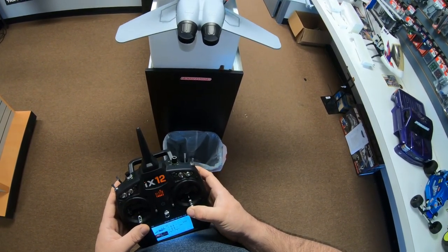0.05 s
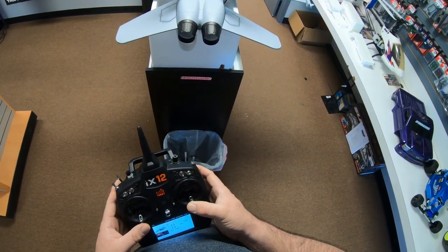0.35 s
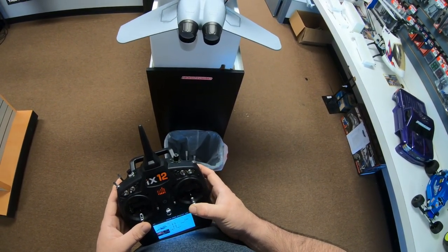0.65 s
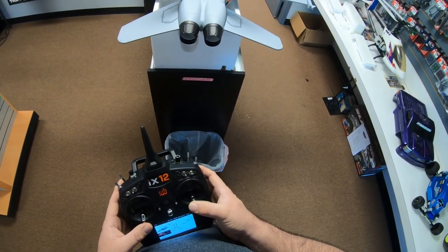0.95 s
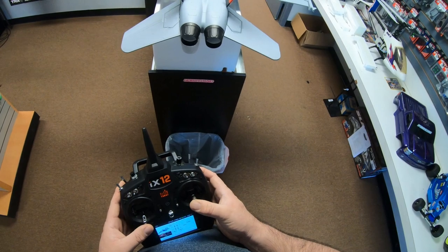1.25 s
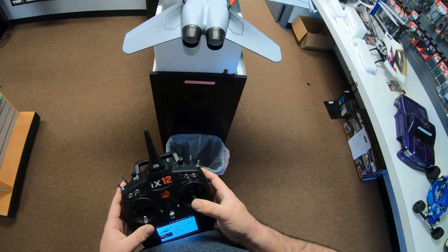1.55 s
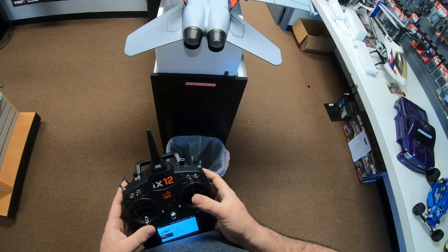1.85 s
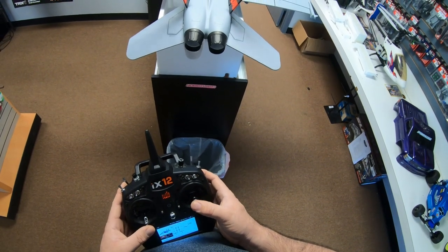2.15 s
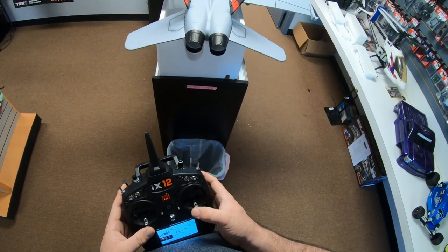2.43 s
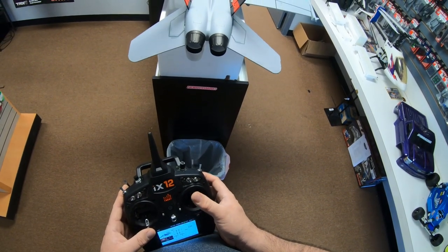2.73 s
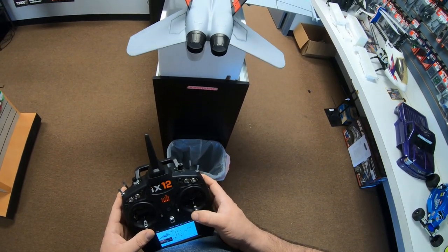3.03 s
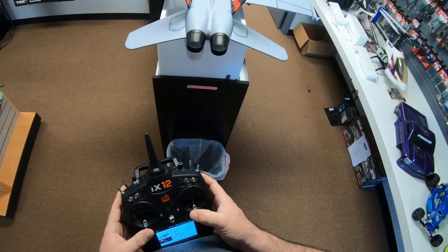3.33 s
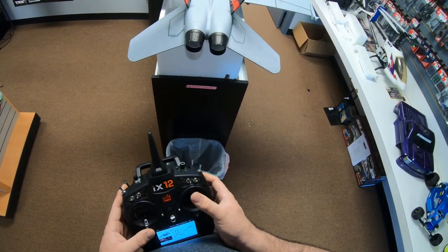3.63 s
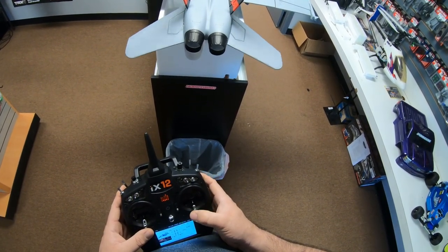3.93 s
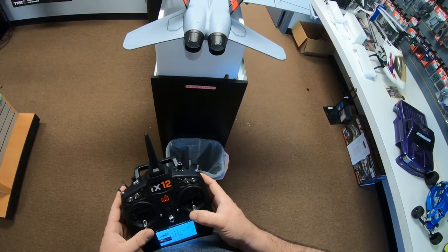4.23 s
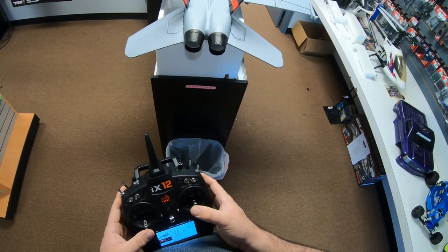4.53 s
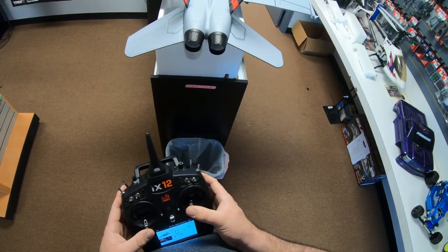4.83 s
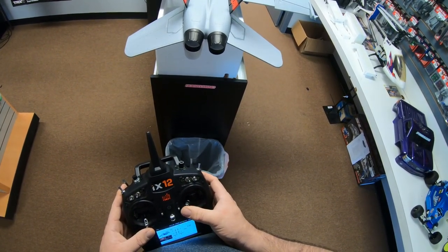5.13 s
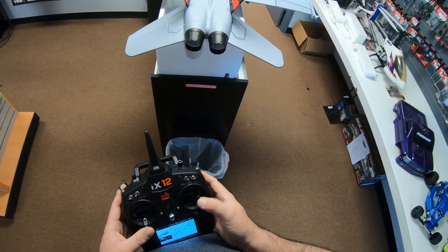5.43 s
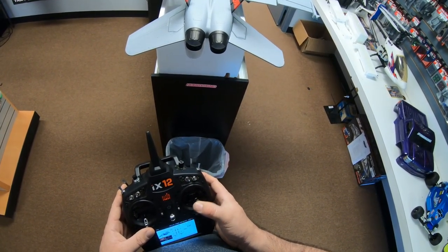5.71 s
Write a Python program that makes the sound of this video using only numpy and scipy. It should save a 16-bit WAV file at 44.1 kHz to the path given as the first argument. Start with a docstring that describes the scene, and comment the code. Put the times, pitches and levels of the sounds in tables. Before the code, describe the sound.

Over the constant low hum and air rumble of a fan in a carpeted room, a model aircraft's tail servos whine nearby in about ten quick bursts, ringing slightly in the hollow body. Faint buzzing ticks fill the pauses and slack pushrods knock softly now and then. Toward the end a different servo makes several more even, higher zipping sweeps, with one sharper click among them.

```python
"""A carpeted shop: a model jet's servos swing its control surfaces to and fro over a steady fan hum.
Two tail servos get one kick of current per radio frame, so their gear whine warbles, and they tick
while holding a load. Slack linkages knock; the swinging surfaces rock the jet on its stand.
A third, evenly driven servo runs near the end. The hollow airframe colours and rings with all three."""
import sys
import numpy as np
from scipy import signal
from scipy.fft import rfft, irfft, next_fast_len
from scipy.io import wavfile
from scipy.ndimage import uniform_filter1d

SR = 44100
rng = np.random.default_rng(int(sys.argv[2]) if len(sys.argv) > 2 else 0)


def generate_wav(signal):
    """Clip the signal to [-1, 1] and save it as 16-bit WAV at the path in sys.argv[1]."""
    frames = np.transpose(np.atleast_2d(signal))
    scaled = np.clip(frames, -1, 1) * 32767
    pcm = np.round(scaled).astype(np.int16)
    wavfile.write(sys.argv[1], SR, pcm)


N = 263277
T = np.arange(N) / SR

# moving air: freq_hz, gain_db
AIR_SPECTRUM = [(12, -72), (20, -14), (164, -12), (194, -15), (223, -7.5), (310, -16.5), (357, -19),
                (421, -22), (525, -19), (603, -23), (1080, -22.5), (2690, -33), (7720, -56.5), (15000, -82)]
# stereo width of the air: freq_hz, side_db
AIR_WIDTH = [(50, -22.5), (220, -15), (400, -15), (800, -4), (2000, -6.5), (8000, -7.5)]
# fan hum lines: pitch_hz, level_db
FAN_LINES = [(118.4, -66), (220.4, -44.5), (360.5, -65), (603, -79.5), (737, -70.5), (1211, -77.5)]
# tail servos holding a load: start_s, end_s, level_db
LOAD_HOLDS = [(0, 0.091, -50), (0.457, .86, -48.5), (0.857, 1.478, -49), (1.899, 2.62, -51),
              (2.949, 3.536, -51), (3.885, 3.951, -48), (4.242, 4.722, -51.5)]
# timbre of their ticks: freq_hz, gain_db
TICK_SPECTRUM = [(400, -6.5), (1500, -7.5), (2300, 0), (3400, 2.5), (4700, -3.5), (5600, -1.5), (7400, -7),
                 (9000, -18), (15000, -34.5)]
# fuselage resonances: freq_hz, width_hz, gain_db
AIRFRAME_MODES = [(1207, 260, -7.5), (2227, 250, 2.5), (3000, 29, -18), (3296, 55, -7), (4400, 140, -33),
                  (6740, 160, -21), (9170, 510, -4.5)]
# linkages taking up play: start_s, thud_db, click_db
LINKAGE_KNOCKS = [(.291, -64, -56.5), (1.349, -42, -44), (3.544, -43, -47), (3.818, -50, -45.5),
                  (3.971, -45, -56), (5.487, -48, -47), (5.596, -35.5, -40), (5.898, -51, -55)]
# linkage resonances: pitch_hz, t60_s, level_db
LINKAGE_MODES = [(407.3, 0.15, -1), (519.3, 0.051, 2.5), (825, 0.062, 1), (987, 0.026, -5),
                 (1180, .05, -1.5)]
# tail strokes, one per stick swing: start_s, fastest_s, end_s, start_mesh_hz, top_mesh_hz,
# level_db, treble_db
TAIL_MOVES = [ (0.474, 0.538, 0.61, 1217, 1479, -29, 1.5), (0.717, .81, 0.86, 1129, 1340, -26.5, 0),
              (1.134, 1.215, 1.351, 1620, 1884, -28.5, 1.6), (1.946, 2.053, 2.22, 960, 1515, -29, 1.24),
              (2.255, 2.472, 2.614, 980, 2252, -26, 0), (2.631, 2.711, 2.997, 1480, 2702, -29.5, 1.65),
              (3.007, 3.164, 3.311, 1135, 3062, -26, 0.16), (3.534, 3.669, 3.796, 1390, 3296, -28, 1.94),
              (3.952, 4.102, 4.226, 1122, 3176, -25.5, 0.4), (4.438, 4.517, 4.6, 1184, 2816, -29.5, 2.4)]
# gear whine, lowest row from the second gear stage: mesh_multiple, slow_db, fast_db
WHINE_ORDERS = [(.41, -16, -5), (1, -5.5, 1.5), (2, 3, -3.5), (3, -7, -7), (4, -13, -15)]
# tail servo timbre: freq_hz, gain_db
TAIL_SPECTRUM = [(200, -46), (400, -21), (600, -12.5), (1000, -10), (1650, -10), (2300, -8.5), (3100, -3),
                 (3800, -5.5), (5100, -4.5), (6200, -6), (7600, -7.5), (8400, -15.5), (9400, -13.5),
                 (10200, -21), (13500, -25), (15500, -39)]
# third servo strokes: start_s, fastest_s, end_s, start_mesh_hz, top_mesh_hz, level_db
THIRD_MOVES = [ (4.92, 5.054, 5.222, 1180, 2302, -29), (5.185, 5.207, 5.24, 1098, 1166, -31),
               (5.262, 5.289, 5.345, 1060, 1523, -37), (5.407, 5.56, 5.635, 1505, 4000, -33.5),
               (5.57, 5.654, 5.748, 2004, 3948, -32.5), (5.845, 5.966, 6.064, 1281, 4047, -27)]
# third servo timbre: freq_hz, gain_db
THIRD_SPECTRUM = [(250, -32), (750, -7), (1650, -11.5), (2400, -2.5), (4000, -2.5), (4800, -5.5),
                  (7200, -4.5), (9300, -14.5), (11000, -17.5), (14500, -25.5), (15500, -32)]
# stereo width of the reflections: freq_hz, side_db
REFLECTION_WIDTH = [(200, -25), (700, -10.5), (1600, 0.5), (2300, -11), (3100, -10.5), (5000, -6),
                    (6800, -4), (8100, 2), (9100, -2.5), (10000, 3), (15000, -2)]
# left-right tilt, applied in part to each channel: freq_hz, left_bias_db
STEREO_TILT = [(700, -2), (1400, 2.5), (3100, 0), (4100, 3.5), (6100, -1), (7700, -3), (8500, 4),
               (9400, -4), (10500, 10.5), (12000, 1.5), (13600, 8.5), (15000, 0)]

FRAME_HZ, FIRST_FRAME_S = 45.41, .0096  # radio frames
ROTOR_TEETH, STOP_MESH_HZ, TOP_HZ = 9, 802.8, 15650
TAIL_DRIVE = dict(rise=1.53, fall=1.91, knee_hz=1732, steepness=3.58, spin_up_s=0.0054)
THIRD_DRIVE = dict(rise=1.62, fall=2.33, knee_hz=2520, steepness=2.44, spin_up_s=0.012)
STRAIN_DB, STRAIN_S = 11, 0.053  # chatter swell around a stroke's start
JOLT_DB, JOLT_S = -45, 0.014  # gears breaking loose


def undb(db):
    """Decibels to gain."""
    return 10 ** (np.asarray(db) / 20)


def unit(x):
    """Scale to rms 1."""
    return x / np.sqrt(np.mean(x ** 2))


def noise():
    """White noise."""
    return rng.standard_normal(N)


def drift(rate_hz):
    """Smooth random drift, rms 1."""
    span = max(int(SR / rate_hz), 2)
    steps = np.repeat(rng.standard_normal(N // span + 1), span)
    return unit(uniform_filter1d(uniform_filter1d(steps, span), span)[:N])


def during(start_s, end_s, fade_s=0.0068):
    """Soft-edged gate."""
    return np.clip((T - start_s) / fade_s + 1, 0, 1) * np.clip((end_s - T) / fade_s + 1, 0, 1)


def colour(x, spectrum, power=1):
    """Filter by (freq_hz, gain_db) points; power scales the dB."""
    size = next_fast_len(N + 8192)
    hz, db = np.transpose(spectrum)
    bins_hz = np.maximum(np.fft.rfftfreq(size, 1 / SR), 1)
    curve_db = power * np.interp(np.log(bins_hz), np.log(hz), db)
    return irfft(rfft(x, size) * undb(curve_db), size)[:N]


def shop_fan():
    """Wavering fan hum over the rumble of moving air; stereo."""
    air, side = (colour(noise(), AIR_SPECTRUM) for _ in range(2))
    air = undb(-51 + .5 * drift(4.2)) * unit(colour(air, [(20, -9.5), (60, -1), (110, -5), (160, 1)]))
    side = colour(undb(-46.5) * unit(side), AIR_WIDTH)
    hum = np.zeros(N)
    for hz, db in FAN_LINES:
        amplitude = np.sqrt(2) * undb(db + 0.39 * drift(8.1))
        hum += amplitude * np.sin(2 * np.pi * hz * T + .12 * drift(17))
    return np.array([air + side + undb(-1.14) * hum, air - side + undb(-0.5) * hum])


def frame_phase():
    """Position 0-1 within each radio frame."""
    return (T - FIRST_FRAME_S) * FRAME_HZ % 1


def current_kick(duty, coast):
    """Rises during the current pulse, then decays; both times in frames."""
    phase = frame_phase()
    return np.minimum(phase / duty, 1) * np.exp(-np.maximum(phase - duty, 0) / coast)


def airframe(x, spectrum):
    """The hollow fuselage adds resonances and colour; rms 1."""
    modes = sum(undb(db) * signal.lfilter(*signal.iirpeak(hz, hz / width_hz, SR), x)
                for hz, width_hz, db in AIRFRAME_MODES)
    return unit(colour(x + modes, spectrum))


def holding_buzz():
    """Each frame nudges the gears across their play: ticks over chatter that grows until they slip."""
    starts_s = [row[0] for row in TAIL_MOVES]
    strain = np.max([np.exp(-((T - start_s) / STRAIN_S) ** 2) for start_s in starts_s], axis=0)
    chatter = undb(-14 + STRAIN_DB * strain)
    frame = np.floor((T - FIRST_FRAME_S) * FRAME_HZ).astype(int) + 1
    nudge = current_kick(duty=.06, coast=.25)
    ticks = noise() * (nudge * undb(3 * noise()[frame]) + chatter)
    held = sum(undb(db) * during(start_s, end_s) for start_s, end_s, db in LOAD_HOLDS)
    jolts = sum(np.exp(-np.abs(T - start_s) / JOLT_S) * (T > start_s) for start_s in starts_s)
    return airframe(ticks, TICK_SPECTRUM) * (held + undb(JOLT_DB) * jolts)


def linkage_knocks():
    """A slack pushrod lands: dull ring, small click."""
    knocks = np.zeros(N)
    for start_s, thud_db, click_db in LINKAGE_KNOCKS:
        age_s = np.maximum(T - start_s, 0)
        thud = np.zeros(N)
        for hz, t60_s, db in LINKAGE_MODES:
            pitch_hz = hz * (1 + 0.009 * rng.standard_normal())
            thud += undb(db) * np.sin(2 * np.pi * pitch_hz * age_s) * 1000 ** (-age_s / t60_s)
        click = noise() * np.exp(-age_s / 0.011) * (T > start_s)
        knocks += undb(thud_db) * thud / 2 + undb(click_db) * click
    return colour(knocks, [(300, 5), (7000, 7.5), (11000, -22)])


def motor_drive(strokes, rise, fall, knee_hz, steepness, spin_up_s):
    """Mesh rate and gain: speed arches over each stroke; loudness follows it up to a knee."""
    mesh_hz, gain = np.full(N, STOP_MESH_HZ), np.zeros(N)
    for start_s, fastest_s, end_s, start_hz, top_hz, db, *_ in strokes:
        up = np.sin(np.pi / 2 * np.clip((T - start_s) / (fastest_s - start_s), 0, 1)) ** rise
        down = np.sin(np.pi / 2 * np.clip((end_s - T) / (end_s - fastest_s), 0, 1)) ** fall
        rising_hz = start_hz + (top_hz - start_hz) * up
        falling_hz = STOP_MESH_HZ + (top_hz - STOP_MESH_HZ) * down
        hz = np.where(T < fastest_s, rising_hz, falling_hz)
        running = during(start_s, end_s)
        engaged = 1 - np.exp(-np.maximum(T - start_s, 0) / spin_up_s)
        mesh_hz = np.maximum(mesh_hz, hz * running)
        gain = np.maximum(gain, running * engaged * undb(db) / np.hypot(1, (knee_hz / hz) ** steepness))
    return mesh_hz, gain


def gears(mesh_hz, orders, rattle_db, grit_db):
    """Whine at multiples of the mesh rate, plus the rattle of uneven teeth striking."""
    teeth_passed = np.cumsum(mesh_hz) / SR
    whine = sum(undb(db + 2 * drift(160)) * np.sin(2 * np.pi * k * teeth_passed) * (k * mesh_hz < TOP_HZ)
                for k, db in orders)
    tooth = teeth_passed.astype(int) % N
    rattle = unit(noise() * undb(grit_db * noise()[tooth]))
    return (whine + undb(rattle_db) * rattle) / np.hypot(1, undb(rattle_db) / 2)


def tail_servos(mesh_hz, gain):
    """Two servos, one slower, surge with every frame; the surges even out near full speed."""
    effort = np.clip((mesh_hz - 900) / 2200, 0, 1)
    duty = 0.162 + 0.325 * effort
    # speed rises under current, falls while coasting
    surge = np.minimum(frame_phase() / duty, (1 - frame_phase()) / (1 - duty)) - .5
    warble = 1 + (.62 - 0.461 * effort) * surge
    # slow gears rattle, fast ones sing
    orders = [(k, slow_db + (fast_db - slow_db) * effort ** 2) for k, slow_db, fast_db in WHINE_ORDERS]
    lead_hz = mesh_hz * (warble + 0.0213 * drift(400))
    lead = gears(lead_hz, orders, rattle_db=5 - 4.5 * effort, grit_db=1)
    lag_hz = .86 * mesh_hz * (warble + .05 * drift(300))
    lag = undb(-5.5) * gears(lag_hz, [(1, -6), (2, 3)], rattle_db=4, grit_db=4)
    # teeth hit hardest as the current starts
    impact_db = (10 - 9 * effort) * (current_kick(duty=0.023, coast=0.78) - .5)
    whir = airframe((lead + lag) * undb(impact_db), TAIL_SPECTRUM)
    # tooth load sets each stroke's brightness
    bright_db = sum(db * during(start_s, end_s) for start_s, _, end_s, *_, db in TAIL_MOVES)
    treble = colour(whir, [(4000, -45), (6500, 9.5)])
    return (whir + treble * (undb(bright_db) - 1)) * gain


def stand_rocking(gain):
    """Swinging surfaces rock the jet on its stand: soft rumble outlasting each stroke."""
    swing = uniform_filter1d(gain, size=SR // 3)
    rumble = colour(noise(), [(15, -25), (35, -5), (72, 1.5), (120, -4.5), (400, -19), (800, -35.5)])
    return undb(-24) * swing * unit(rumble)


def third_servo():
    """Even drive, rough whine growing with speed; the unbalanced rotor shakes a body resonance."""
    mesh_hz, gain = motor_drive(THIRD_MOVES, **THIRD_DRIVE)
    rough_hz = mesh_hz * (1 + .025 * drift(150) + .04 * drift(900))
    rattle_db = np.interp(mesh_hz, [2000, 3600], [14, 7])
    teeth = gears(rough_hz, [(1, 1), (2, -12)], rattle_db, grit_db=3)
    whir = airframe(teeth, THIRD_SPECTRUM)
    rotor = np.sin(2 * np.pi * np.cumsum(rough_hz / ROTOR_TEETH) / SR)
    shake = rotor * (mesh_hz / mesh_hz.max()) ** 2 * undb(3.4 * drift(70))
    body = signal.lfilter(*signal.iirpeak(434, Q=9, fs=SR), shake)
    return whir * gain + undb(-43) * body


def reflections(x, t60_s):
    """Dense decaying reflections at the input's energy."""
    age_s = T[:SR // 2]
    tail = rng.standard_normal(len(age_s)) * 1000 ** (-age_s / t60_s) * (1 - np.exp(-age_s * 1000))
    return signal.fftconvolve(x, tail / np.linalg.norm(tail))[:N]


def in_room(x):
    """Direct sound, nearby surfaces and a faint room; stereo."""
    near = reflections(x, t60_s=.05)
    mid = undb(-2) * x + undb(-9) * near + undb(-12) * reflections(x, t60_s=0.33)
    side = undb(-3) * reflections(x, t60_s=0.065) + undb(-9) * reflections(x, t60_s=0.25)
    side = colour(side, REFLECTION_WIDTH)
    left = colour(mid + side, STEREO_TILT, power=0.53)
    right = colour(mid - side, STEREO_TILT, power=-0.39)
    return np.array([left, right])


def scene():
    """The jet in the shop."""
    mesh_hz, gain = motor_drive(TAIL_MOVES, **TAIL_DRIVE)
    return (shop_fan() + in_room(holding_buzz() + linkage_knocks())
            + in_room(tail_servos(mesh_hz, gain)) + stand_rocking(gain) + in_room(third_servo()))


def record(dry):
    """Steep low-pass at TOP_HZ."""
    return signal.sosfilt(signal.ellip(10, .1, 80, TOP_HZ, fs=SR, output="sos"), dry)


dry = scene()
out = record(dry)
generate_wav(out)
```